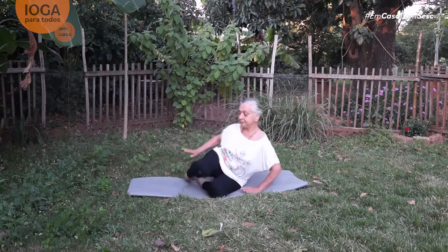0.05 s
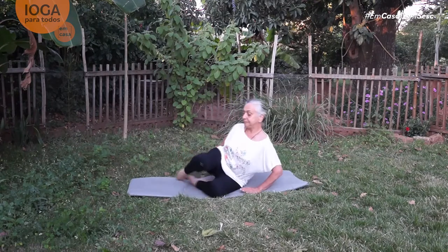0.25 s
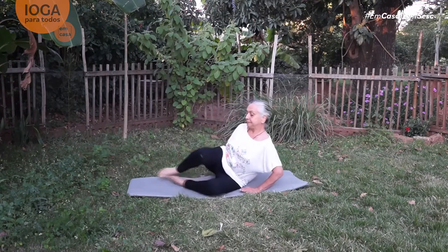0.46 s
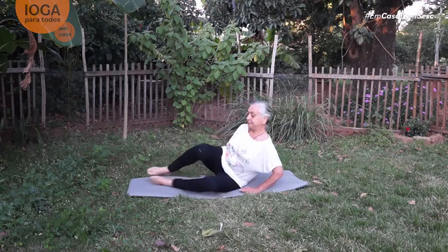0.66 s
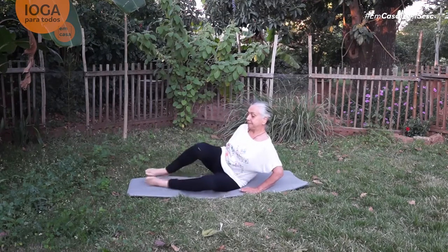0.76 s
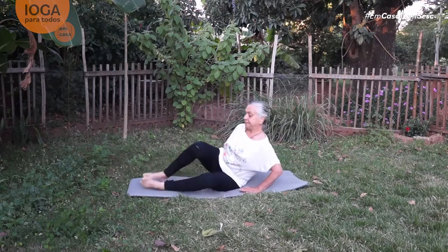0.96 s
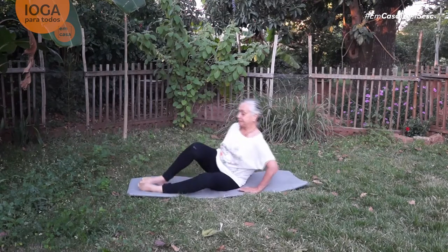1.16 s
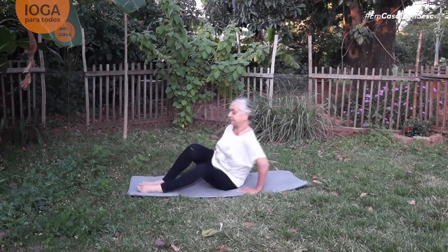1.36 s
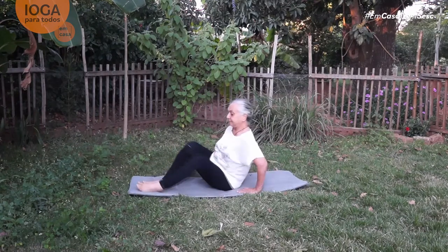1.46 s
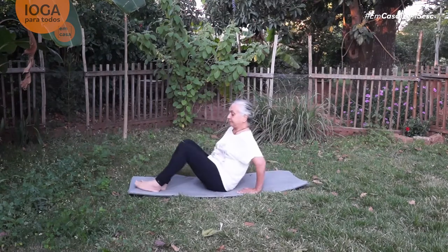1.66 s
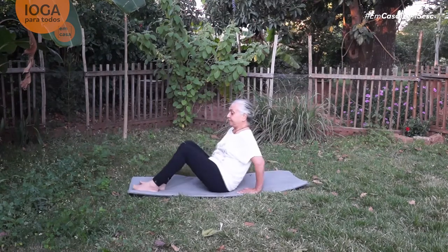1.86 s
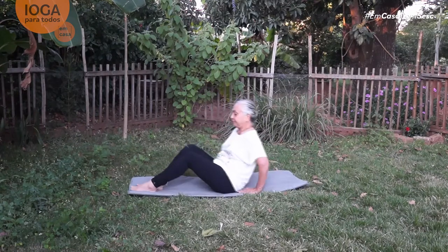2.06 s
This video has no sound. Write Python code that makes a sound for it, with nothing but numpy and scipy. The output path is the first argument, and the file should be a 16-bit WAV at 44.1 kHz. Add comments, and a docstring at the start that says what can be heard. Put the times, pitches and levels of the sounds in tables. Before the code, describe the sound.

Clothing hisses and faintly zips across a ribbed mat as someone shifts their legs.

```python
"""Cloth sliding on a soft exercise mat, close to a stereo microphone pair in a quiet garden.
Someone's legs slide out, then are drawn back. The fabric hisses in countless tiny slips, and the
mat's fine ribs zip at a pitch that follows the speed of the slide. Between slides the body scuffs
and bumps dully. Faint outdoor air and a low hum lie behind; a noise suppressor is in the chain."""
import sys
import numpy as np
from scipy import signal
from scipy.fft import rfft, irfft
from scipy.io import wavfile
from scipy.ndimage import uniform_filter1d

SR = 44100
rng = np.random.default_rng(int(sys.argv[2]) if len(sys.argv) > 2 else 0)


def to_wav(s):
    """Save 16-bit WAV."""
    ch = np.atleast_2d(s).T  # columns
    pcm = np.round(np.clip(ch, -1, 1) * 32767)  # PCM
    wavfile.write(sys.argv[1], SR, pcm.astype(np.int16))


N = 92610
TIME = np.arange(N) / SR
FREQS = np.fft.rfftfreq(N, 1 / SR)

# How each layer swells and fades. Each row: time in seconds, level in dB.
HISS_LEVEL = [(0,-62.5),(.07,-48.5),(.18,-45.5),(.27,-42.5),(.3,-37),(.34,-39.5),(.39,-38),(.51,-40),(.55,-36),(.63,-32.5),(.665,-34.5),(.69,-39.5),(.78,-38),(.84,-44.5),(1.01,-47.5),(1.13,-49),(1.22,-56),(1.36,-49.5),(1.39,-42),(1.45,-46),(1.6,-43),(1.67,-38.5),(1.76,-46),(1.9,-53.5),(2.1,-50.5)]  # treble of the sliding cloth
FIZZ_LEVEL = [(.1,-86),(.27,-50.5),(.335,-36.5),(.39,-47.5),(.52,-39.5),(.63,-33),(.72,-41),(1.02,-45.5),(1.25,-62),(1.58,-70),(1.66,-42.5),(1.85,-89)]  # stretched fabric
RASP_LEVEL = [(0,-67.5),(.08,-56.5),(.19,-51),(.23,-45.5),(.33,-39.5),(.49,-43.5),(.56,-39),(.64,-44.5),(.72,-50.5),(.82,-47),(1.1,-51.5),(1.3,-61.5),(1.4,-49),(1.59,-47.5),(1.68,-40),(1.8,-45.5),(1.9,-52.5),(2.1,-55)]  # lower grain of the cloth
SCUFF_LEVEL = [(.9,-68),(1.19,-57),(1.235,-48),(1.39,-47.5),(1.44,-52.5),(1.6,-61.5),(1.85,-57.5)]  # hips on the mat
WEIGHT_LEVEL = [(0,-68),(.26,-74),(.3,-56.5),(.36,-52.5),(.46,-58.5),(.51,-64.5),(.6,-62.5),(.72,-63.5),(.82,-74.5),(.9,-64),(1.08,-83),(1.22,-57),(1.36,-50.5),(1.5,-54),(1.62,-55),(1.8,-62.5),(1.88,-58.5),(2.1,-58)]  # weight rubbing on foam
AIR_LEVEL = [(0,-71.5),(.85,-61.5),(1.2,-62),(2,-60.5)]
HUM_LEVEL = [(.75,-87),(.89,-66.5),(1.2,-63.5),(1.58,-74),(1.95,-59.5),(2.04,-54.5)]
# Tone of the layers. Each row: frequency in Hz, relative gain in dB.
HISS_EQ = [(1600,-61),(3300,-11),(4400,-5.5),(5600,-2.5),(6800,2),(8000,1),(9200,-5.5),(10500,-12.5),(15500,-30)]
FIZZ_EQ = [(5000,-61),(7500,2),(9000,0.5),(11000,-8),(14500,-13),(15500,-12.5)]
RASP_EQ = [(700,-101),(1100,-23.5),(1600,-8.5),(2000,-2.5),(2800,-0.5),(3600,-2),(4400,-0.5),(5800,-3),(9000,-24)]
SCUFF_EQ = [(100,-1),(400,-12.5),(700,2.5),(1000,0),(1450,-1),(2100,-4),(3200,-17),(8000,-73)]
WEIGHT_EQ = [(20,-19),(70,-27),(130,0.5),(240,-5),(350,1),(500,-4),(660,-23.5),(900,-24),(2500,-46)]
AIR_EQ = [(20,-20),(60,6),(220,-7),(420,-7),(720,-14),(1050,-5),(1500,-3),(2200,-1.5),(8000,-8),(12000,-55)]
RIB_EQ = [(800,-25),(1150,2.5)]  # the ribs radiate little bass
# Stereo width at the microphones. Each row: frequency in Hz, extra side gain in dB.
SIDE_EQ = [(40,-11.5),(250,-2.5),(600,4),(3000,-1),(6500,-15.5),(8600,17),(10500,-18.5)]
# Hollow rubs. Each row: middle and half length in seconds, level in dB, pitch and width in Hz.
HOLLOW_RUBS = [(0.303,0.13,-56,1044,186),(0.305,0.067,-50.5,1570,260),(0.206,.04,-54.5,2230,350),(0.227,0.0075,-42.5,2320,500),(0.25,0.011,-42.5,2780,970),(0.41,0.012,-39.5,6970,850),(1.76,0.13,-59.5,1244,318),(1.992,0.063,-55.5,980,83.33)]
# Slides over the ribs. Each row: time in seconds, rib rate in Hz, level in dB ahead of RIB_EQ.
KICK_SLIDE = [(.281,1800,-53),(.293,2850,-39),(.313,3200,-40),(.325,4100,-37),(.331,4350,-43),(.346,5600,-39.5),(.361,7300,-41)]
STRETCH_SLIDE = [(.62,5000,-43),(.68,4500,-43),(.745,3217,-45.5),(.78,2860,-48),(.86,2000,-60)]
RETURN_SLIDE = [(1.43,2402,-61),(1.47,2901,-52),(1.53,3450,-47.5),(1.563,3830,-42),(1.588,3800,-42.5),(1.602,3650,-49)]
SLOW_DRAG = [(0.708,1248,-64),(.76,1350,-50.5),(.82,1365,-60),(0.961,1270,-58.5)]
# Zip of the kick, stretch and return. Each row: width as a share of the pitch, octave gain in dB.
ZIP_TIMBRES = [(.1,-11),(.25,-11),(.27,-15)]
# Heel and hand on the mat. Each row: start in seconds, level in dB, pitch in Hz.
MAT_BUMPS = [(.286,-40,370),(.355,-44,335),(.417,-43,300),(1.299,-44,300),(1.348,-39,270),(1.369,-38.5,300),(1.449,-39.5,560),(1.457,-37,400),(1.868,-41,556),(1.884,-43,520),(1.915,-39,340)]
# Short pulses: cloth snaps at 0.35 and 0.6 s, and brief thuds of the body on the mat from 1.26 s on. Each row:
# middle in seconds, level in dB, pitch in Hz.
SHORT_PULSES = [(.3465,-27,1750),(.602,-26,7640),(1.26,-36,1150),(1.296,-36,950),(1.3445,-37,700),(1.388,-35,620),(1.923,-40,1180)]
# Noise suppressor bands. Each row: centre and width in Hz, threshold in dB per Hz.
SUPPRESSOR_BANDS = [(860,130,-90),(1200,450,-100),(1740,110,-85),(3780,90,-79)]


def amp(db):
    """Decibels to gain."""
    return 10 ** (np.asarray(db) / 20)


def unit(x):
    """Scales to rms 1."""
    return x / np.sqrt(np.mean(x ** 2) + 1e-20)


def curve(rows, column=1):
    """Joins the points of a time table."""
    rows = np.array(rows, float)
    return np.interp(TIME, rows[:, 0], rows[:, column])


def wander(hz):
    """Smooth random drift at rates up to about hz."""
    return unit(irfft(rfft(rng.standard_normal(N)) * np.exp(-(FREQS / hz) ** 2), N))


def equalise(x, eq, gain_db=0):
    """Filters by a table of gains, joined on a linear frequency axis."""
    return irfft(rfft(x) * amp(gain_db + np.interp(FREQS, *np.transpose(eq))), N)


def colour(x, eq, hollow_hz=796, hollow_width_hz=137, hollow_db=-5.5):
    """Gives a noise its spectrum, with a hollow in the midrange, at rms 1."""
    hz, db = np.transpose(eq)
    tone_db = np.interp(np.log(FREQS + 1), np.log(hz), db)
    dip_db = hollow_db * np.exp(-((FREQS - hollow_hz) / hollow_width_hz) ** 2)
    return unit(irfft(rfft(x) * amp(tone_db + dip_db), N))


def spread(pair, side_db, lean_db):
    """Mid and side to left and right; a positive lean favours the left microphone."""
    mid, side = pair[0], equalise(pair[1], SIDE_EQ, side_db)
    lean = amp(lean_db / 2)
    return np.array([(mid + side) * lean, (mid - side) / lean])


def friction(eq, per_s, size_db, flutter_db, flutter_hz, side_db, lean_db):
    """Many tiny slips of uneven size, arriving in clumps."""
    sizes = amp(size_db * np.minimum(rng.exponential(1, (2, N)), 5))
    slips = rng.standard_normal((2, N)) * sizes * (rng.random((2, N)) < per_s / SR)
    clumps = amp(flutter_db * wander(flutter_hz))
    return spread(colour(slips * clumps, eq), side_db, lean_db)


def cloth():
    """Fabric slipping over the mat: a rasp, a hiss above it and a fine fizz on top."""
    hiss = friction(HISS_EQ, per_s=16000, size_db=-2.5, flutter_db=1.2, flutter_hz=57,
                    side_db=-22.5, lean_db=0.7)
    fizz = friction(FIZZ_EQ, per_s=9900, size_db=1.5, flutter_db=0.5, flutter_hz=121,
                    side_db=-38, lean_db=0.7)
    rasp = friction(RASP_EQ, per_s=14000, size_db=1.8, flutter_db=1, flutter_hz=68,
                    side_db=-20.5, lean_db=-0.5)
    return hiss * amp(curve(HISS_LEVEL)) + fizz * amp(curve(FIZZ_LEVEL)) + rasp * amp(curve(RASP_LEVEL))


def body():
    """Hips scuff coarsely and the body's weight rubs dully on the foam."""
    scuff = friction(SCUFF_EQ, per_s=4000, size_db=-1, flutter_db=0.45, flutter_hz=68.5,
                     side_db=-11.5, lean_db=1)
    weight = friction(WEIGHT_EQ, per_s=1800, size_db=2.4, flutter_db=1, flutter_hz=40.2,
                      side_db=-4.5, lean_db=1)
    return scuff * amp(curve(SCUFF_LEVEL)) + weight * amp(curve(WEIGHT_LEVEL))


def garden(hum_hz=121, waver_db=-0.5):
    """The background: faint air, wide across the microphones, and a wavering hum in the centre."""
    air = spread(colour(rng.standard_normal((2, N)), AIR_EQ), side_db=2, lean_db=3.5)
    phase = 2 * np.pi * hum_hz * TIME + 0.97 * wander(hz=22)
    hum = unit(np.sin(phase) * amp(waver_db * np.tanh(wander(hz=25))))
    return air * amp(curve(AIR_LEVEL)) + hum * amp(curve(HUM_LEVEL))


def rubs():
    """Skin and cloth rub the mat briefly, each rub swelling and fading in one narrow resonance."""
    out = 0
    for middle_s, half_s, db, hz, width_hz in HOLLOW_RUBS:
        band = 1 / (1 + (2 * (FREQS - hz) / width_hz) ** 4)
        rub = unit(irfft(rfft(rng.standard_normal(N)) * band, N))
        out += rub * amp(db) * np.exp(-((TIME - middle_s) / half_s) ** 2)
    return out


def rib_zip(slide, width, octave_db, grip_db=1.2, grip_hz=190, fade_s=0.018):
    """Cloth catching on the ribs: a fuzzy whistle and its octave, pitched by the sliding speed."""
    rib_hz = curve(slide) * (1 + 0.01464 * wander(hz=91.7))
    ribs_passed = np.cumsum(rib_hz) / SR
    rib_grid = np.arange(N) / 4  # four noise points a rib, so the fuzz widens with the pitch
    pole = np.exp(-np.pi * width / 4)
    whistle = 0
    for harmonic, db in ((1, 0.02), (2, octave_db)):
        noise = rng.standard_normal(N) + 1j * rng.standard_normal(N)
        sway = signal.lfilter([1], np.poly([pole ** harmonic] * 2), noise)
        sway /= (abs(sway) + 1e-9) ** 0.25  # evens out the swells
        carrier = np.exp(2j * np.pi * harmonic * ribs_passed)
        whistle += amp(db) * unit((np.interp(ribs_passed, rib_grid, sway) * carrier).real)
    whistle = unit(whistle * amp(grip_db * wander(grip_hz)))  # the cloth grips unevenly
    outside_s = np.maximum(slide[0][0] - TIME, 0) + np.maximum(TIME - slide[-1][0], 0)
    return whistle * amp(curve(slide, column=2)) * np.exp(-outside_s / fade_s)


def slides():
    """The legs kick out, stretch and draw back over the ribs; a second limb drags slowly."""
    moves = (KICK_SLIDE, STRETCH_SLIDE, RETURN_SLIDE)
    zips = sum(rib_zip(slide, *timbre) for slide, timbre in zip(moves, ZIP_TIMBRES))
    drag = rib_zip(SLOW_DRAG, width=0.17, octave_db=-16)
    return equalise(zips + drag, RIB_EQ)


def bumps(rise_s=0.002, fall_s=0.0046):
    """Heel and hand bump the soft mat, each a heavily damped low note."""
    out = 0
    for start_s, db, hz in MAT_BUMPS:
        age = np.maximum(TIME - start_s, 0)
        envelope = np.minimum(age / rise_s, 1) * np.exp(-np.maximum(age - rise_s, 0) / fall_s)
        out += amp(db) * envelope * np.sin(2 * np.pi * hz * age)
    return out


def pulses(half_length_cycles=0.71):
    """The cloth snaps, and the body thuds briefly on the mat, in pulses only a cycle or two long."""
    out = 0
    for middle_s, db, hz in SHORT_PULSES:
        cycles = (TIME - middle_s) * hz
        out += amp(db) * np.exp(-(cycles / half_length_cycles) ** 2) * np.sin(2 * np.pi * cycles)
    return out


def suppress(x):
    """A noise suppressor: its bands close when the sound in them is quiet and open when it is loud."""
    frames = dict(fs=SR, nperseg=1024, noverlap=768, scaling="psd")
    f, _, spectra = signal.stft(x, **frames)
    power = 2 * np.mean(abs(spectra) ** 2, axis=0)
    power = uniform_filter1d(power, size=7, axis=0)  # across frequency
    power = uniform_filter1d(power, size=5, axis=1)  # across time
    threshold = sum(amp(db) ** 2 * np.exp(-((f - hz) / width) ** 2) for hz, width, db in SUPPRESSOR_BANDS)
    gain = 1 / (1 + threshold[:, None] / (abs(power) + 1e-20))
    return signal.istft(spectra * gain, **frames)[1][:, :N]


def scene():
    """The movement on the mat and the garden behind it, as they reach the microphones."""
    return cloth() + slides() + rubs() + body() + bumps() + pulses() + garden()


def record(dry, fade_s=0.0375, cutoff_hz=15450):
    """The recorder: a quick fade up from half gain, noise suppression and a steep treble cut."""
    fade = np.minimum(0.5 + 0.5 * TIME / fade_s, 1)
    lowpass = signal.firwin(511, cutoff_hz, window=("kaiser", 9), fs=SR)
    return signal.oaconvolve(suppress(dry * fade), lowpass[None], "same")


dry = scene()
out = record(dry)
to_wav(out)
```